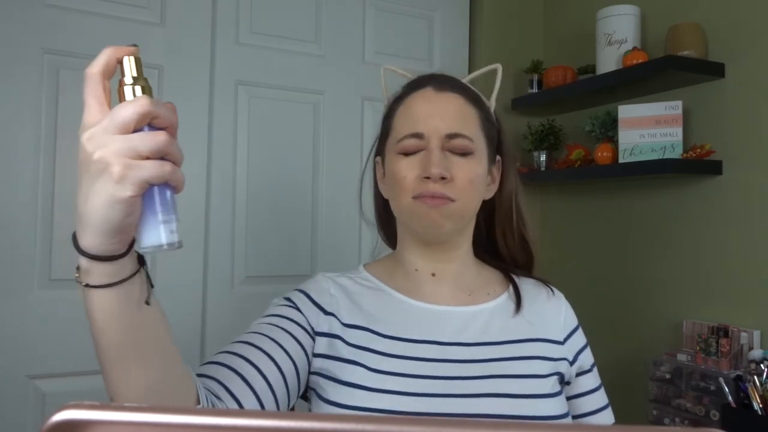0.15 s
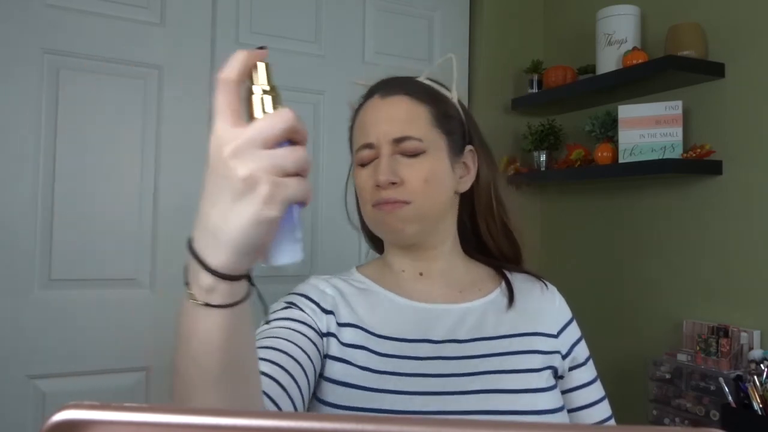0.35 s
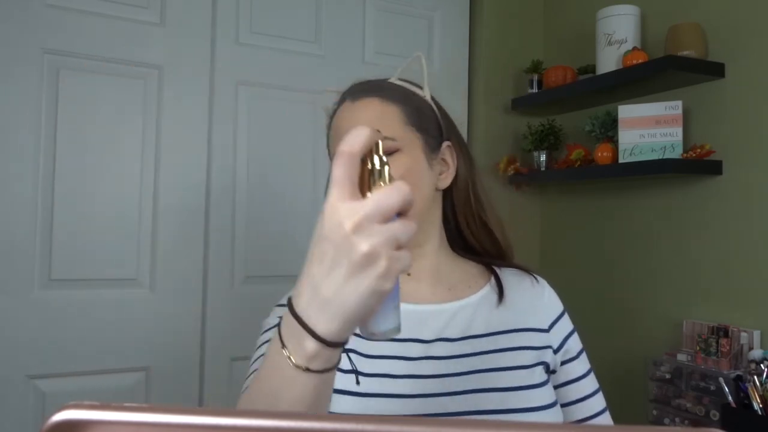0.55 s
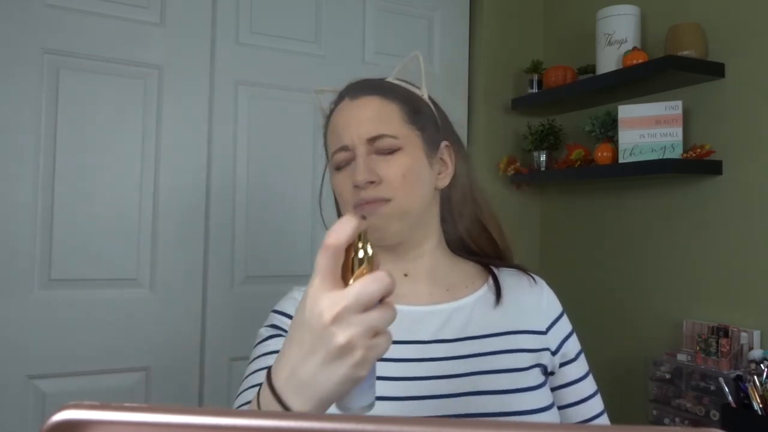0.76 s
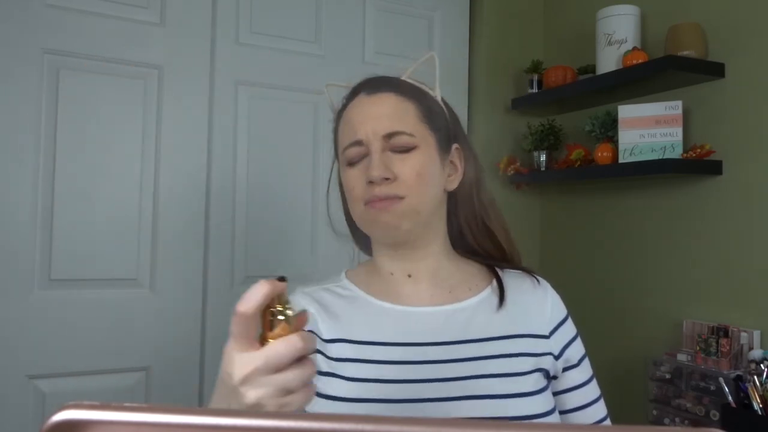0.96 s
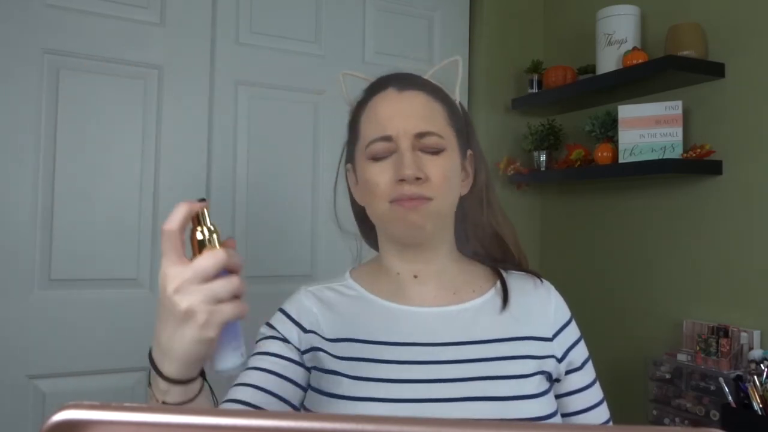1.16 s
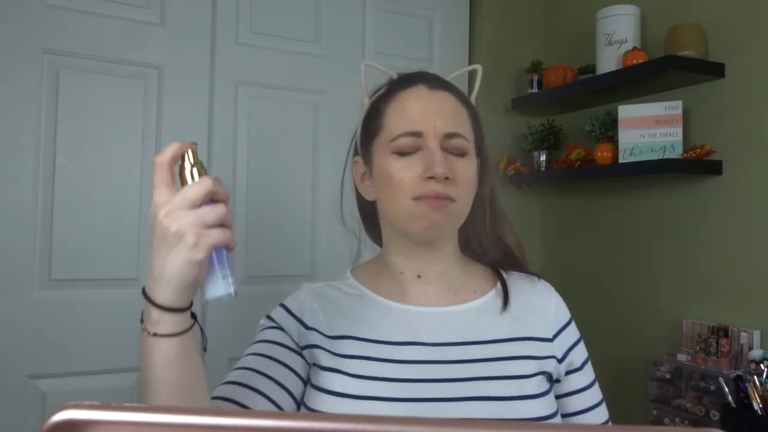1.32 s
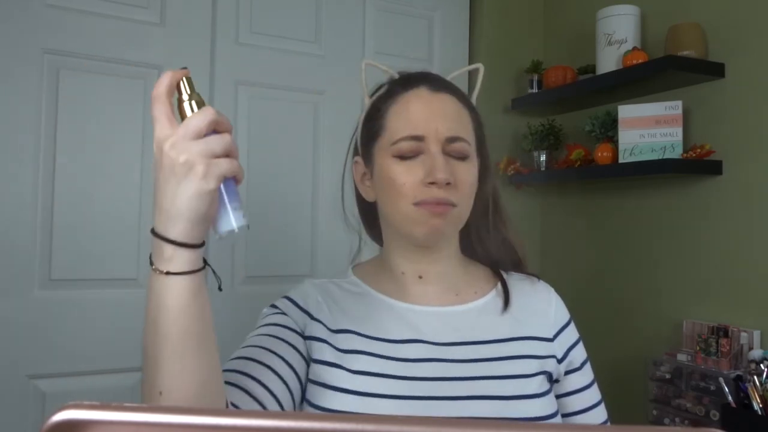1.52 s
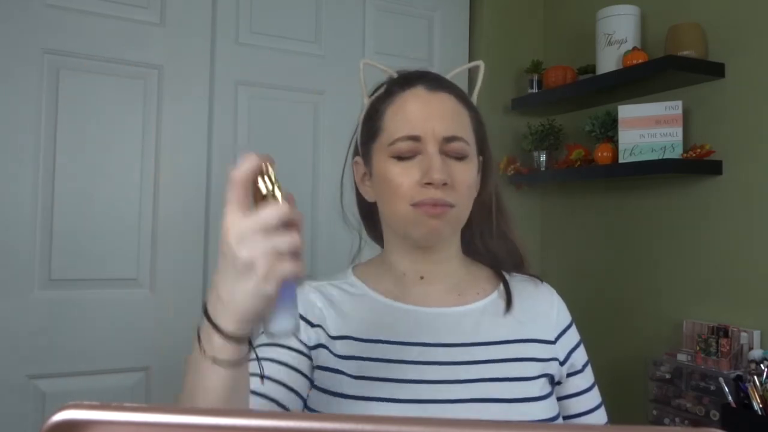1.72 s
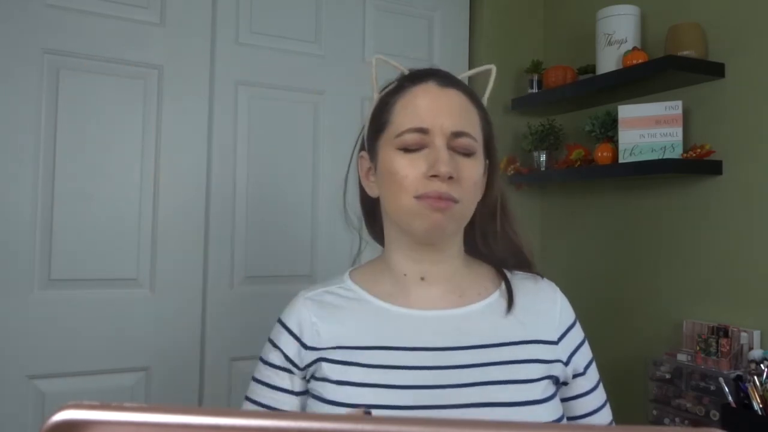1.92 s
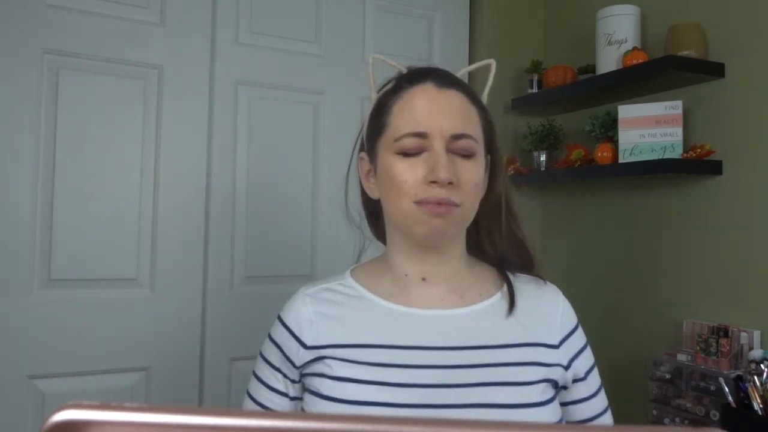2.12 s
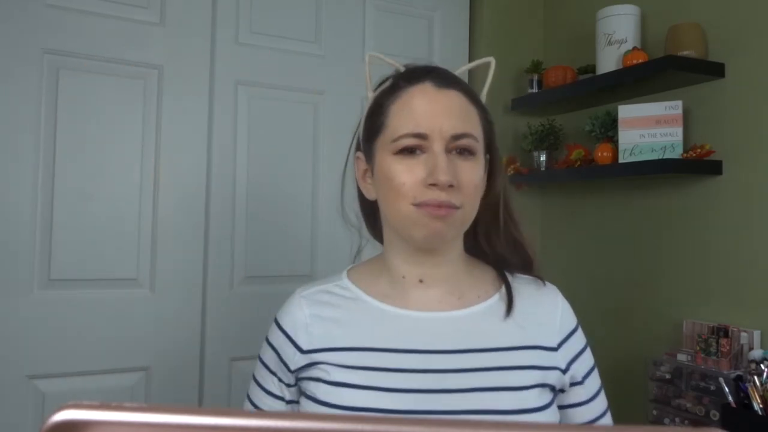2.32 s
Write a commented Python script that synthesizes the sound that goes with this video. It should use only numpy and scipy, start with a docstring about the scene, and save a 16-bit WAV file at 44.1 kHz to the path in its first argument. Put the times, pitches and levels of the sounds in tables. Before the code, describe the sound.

A hand mist sprayer is pumped quickly, short bright hisses ending in hard clicks, with spring ticks and faint refill fizz between; a last press follows a pause, then a soft low table thud. Close stereo microphone, small live room.

```python
"""A small mist pump is pressed quickly seven times in a small room.
Presses: coloured noise hisses through the nozzle until the plunger snaps against its stop.
Spring and refill: ticks with dull knocks and short rings; grainy noise as the chamber refills.
At the end the bottle is set down: table modes, a low noise shudder and a slow sway.
Echoes are noise responses in decaying bands; quiet room air and a faint hum lie beneath."""
import sys
import numpy as np
from scipy import signal
from scipy.fft import rfft, irfft
from scipy.io import wavfile
from scipy.ndimage import map_coordinates

SR = 44100
rng = np.random.default_rng(int(sys.argv[2]) if len(sys.argv) > 2 else 0)


def wrap_up_sound(samples):
    """Save the sound to the file named by the first command line argument, as 16-bit audio."""
    columns = np.atleast_2d(samples).T
    # keep every value between -1 and 1, then stretch to whole-number steps
    tamed = np.clip(columns, -1, 1)
    steps = np.round(tamed * 32767).astype(np.int16)
    wavfile.write(sys.argv[1], SR, steps)


N = 104958
LEAD = SR // 4  # samples run before the scene, cut off at the end
T = np.arange(-LEAD, N) / SR


def undb(db):
    """Decibels to gain."""
    return 10 ** (np.asarray(db) / 20)


def unit(x):
    """Scale to rms 1."""
    return x / np.sqrt(np.mean(x ** 2))


def noise():
    """White noise for the whole scene."""
    return rng.standard_normal(len(T))


def walk(hz):
    """Random values at rate hz, joined by straight lines, rms 1."""
    knots = rng.standard_normal(len(T) // 2)
    return unit(np.interp((T - T[0]) * hz, np.arange(len(knots)), knots))


def fade(age, t60):
    """Exponential decay that starts at age 0 and falls 60 dB in t60."""
    return (age >= 0) * np.exp(-np.log(1000) * np.maximum(age, 0) / t60)


def onset(age, rise_s):
    """Exponential approach to 1 with time constant rise_s."""
    return 1 - np.exp(-age / rise_s)


def through(x, response):
    """Convolve with a response, keeping the length."""
    return signal.fftconvolve(x, response)[:len(x)]


def colour(x, points, size=4096):
    """Minimum-phase filter of unit energy through (Hz, dB) points."""
    hz, db = np.array(points, float).T
    f = np.maximum(np.fft.rfftfreq(size, 1 / SR), 1)
    log_gain = np.log(undb(np.interp(np.log(f), np.log(hz), db)))
    cepstrum = irfft(log_gain)
    # folding the cepstrum makes the filter causal
    cepstrum[1:size // 2] *= 2
    cepstrum[size // 2 + 1:] = 0
    h = irfft(np.exp(rfft(cepstrum)))
    return through(x, h / np.sqrt(np.sum(h ** 2)))


def pan(x, db):
    """Place a sound by its left-right difference."""
    return x * undb(np.array([[db], [-db]]) / 2)


CONTACT_GAP_S, FIRST_CONTACT_DB = .00014, -5.5
CAP_RATTLE_DB, CAP_T60_S = -5, 0.0072


def snap(at):
    """Hard double contact, two opposite impulses, and a very short noise rattle of the cap."""
    x = noise() * fade(T - at, CAP_T60_S)
    x *= undb(CAP_RATTLE_DB) / np.sqrt(np.sum(x ** 2))
    x[np.searchsorted(T, at)] += undb(FIRST_CONTACT_DB)
    x[np.searchsorted(T, at + CONTACT_GAP_S)] -= 1
    return x / np.hypot(1, undb(FIRST_CONTACT_DB))


# pump presses: start_s, stop_s, mist_level_db, swell_db, stop_click_db, left_minus_right_db
PRESSES = [(-.045, -.006, -42.5, 2.5, -12.5, -10.5), (0.218, .2511, -37.5, 4.5, -7, 5),
           (0.4597, 0.4938, -36.5, 3, -7, 1.5), (0.7039, .7650, -37, 2.5, -5.5, 1),
           (0.943, 1.0054, -37, 4, -5, 2), (1.2098, 1.2550, -36, 5.5, -11, 4),
           (1.6529, 1.6924, -40, 5.5, -8, 1.5)]
# nozzle mist spectrum: freq_hz, level_db
MIST_SPECTRUM = [(300, -29.5), (900, -18), (1400, -15), (2000, -4.5), (2700, -4), (4000, 2), (5100, -2.5),
                 (6200, -0.5), (7600, -4.5), (9000, -2.5), (11000, -9.5)]
# plunger stop spectrum: freq_hz, level_db
STOP_SPECTRUM = [(300, -24.5), (900, -19.5), (1500, -14), (2300, 0.5), (3400, 0), (5000, -3.5), (6800, 4),
                 (8500, -7.5), (11000, -13)]
OPEN_S, CLOSE_S = 0.0016, 0.0027
SPUTTER_DB, SPUTTER_HZ = -0.14, 705
MIST_WIDTH = 0.24  # side rms re jet before sputter


def presses():
    """Mist swells with finger pressure and shuts off as the plunger hits its stop."""
    out = 0
    jet = unit(colour(noise(), MIST_SPECTRUM)) * undb(SPUTTER_DB * walk(SPUTTER_HZ))
    cloud = MIST_WIDTH * unit(colour(noise(), MIST_SPECTRUM)) * np.array([[1], [-1]])
    for start, stop, mist_db, swell_db, stop_db, pan_db in PRESSES:
        travel = np.clip((T - start) / (stop - start), 0, 1)
        opening = np.clip((T - start) / OPEN_S, 0, 1)
        flow = opening * np.exp(-np.maximum(T - stop, 0) / CLOSE_S)
        mist = (jet + cloud) * flow * undb(mist_db + swell_db * (travel - 1.0))
        click = undb(stop_db) * colour(snap(stop), STOP_SPECTRUM)
        out = out + pan(mist + click, pan_db)
    return out


# room by band: lower_edge_hz, tail_t60_s, stereo_width_ratio
WALLS = [(0, 0.86, 0.67), (1520, 0.94, 0.37), (2940, 0.75, 0.8), (5310, 0.56, 1.3), (8100, 0.61, 1.1)]
EARLY_DB, EARLY_T60_S, LATE_DB, FIRST_ECHO_S = -0.5, 0.26, -3.5, 0.0036


def echoes():
    """Room response for one place of the hand: dense early echoes and a weaker, longer tail."""
    age = np.arange(SR) / SR - FIRST_ECHO_S
    lower_edges = [row[0] for row in WALLS]
    band = np.searchsorted(lower_edges, np.fft.rfftfreq(SR, 1 / SR)) - 1
    spectra, out = rfft(rng.standard_normal((2, SR))), 0
    for k, (_, t60, width) in enumerate(WALLS):
        mid, side = irfft(spectra * (band == k), SR)
        early = undb(EARLY_DB) * unit(fade(age, EARLY_T60_S))
        late = undb(LATE_DB) * unit(fade(age, t60))
        shape = np.hypot(early, late) / np.sqrt(SR)
        stereo = np.array([mid + width * side, mid - width * side]) / np.hypot(1, width)
        out = out + shape * stereo
    return out


# echo spectrum: freq_hz, level_db
ROOM_SPECTRUM = [(200, 10.5), (1000, 1.5), (1600, 4), (2200, 1.5), (2900, -1.5), (4100, 0.5), (5200, -2.5),
                 (5900, 5.5), (6800, 7), (7600, 1), (9400, 3), (11000, -1.5)]
ECHO_CHANGE_HZ, ROOM_PAN_DB = 35, 1.5


def room(x, count=5):
    """Random shares of several responses: echoes keep changing as the hand sweeps the bottle about."""
    wet = colour(x, ROOM_SPECTRUM)
    shares = np.array([walk(ECHO_CHANGE_HZ) for _ in range(count)])
    shares /= np.sqrt(np.sum(shares ** 2, axis=0))
    parts = [np.array([through(wet * share, w) for w in echoes()]) for share in shares]
    return pan(sum(parts), ROOM_PAN_DB)


ALIKE_HZ = 510  # side high-pass corner


def diffuse(points):
    """Noise from all around: the bass is alike in both ears, the treble is not."""
    mid, side = colour(noise(), points), colour(noise(), points)
    highpass = signal.butter(1, ALIKE_HZ, "high", fs=SR, output="sos")
    side = signal.sosfilt(highpass, side)
    return (mid + side * np.array([[1], [-1]])) / np.std(mid)


# room air spectrum: freq_hz, level_db
AIR_SPECTRUM = [(20, -18), (40, -9), (80, -0.5), (118, 1), (160, 1), (250, 0.5), (420, 4), (650, 3.5),
                (1000, -1), (1400, -7), (2300, -6), (4000, -14.5), (7000, -15.5), (11000, -23)]
AIR_DB, AIR_BALANCE_DB = -62.5, 0.8
HUM_HZ, HUM_DB, HUM_WAVER_HZ = 114.4, -75, 8.11


def background():
    """Still room air as diffuse noise; a faint hum wavers in level and phase."""
    hum = (1 + walk(HUM_WAVER_HZ) / 2) * np.sin(2 * np.pi * HUM_HZ * T + walk(HUM_WAVER_HZ))
    air = pan(diffuse(AIR_SPECTRUM), AIR_BALANCE_DB)
    return undb(AIR_DB) * air + undb(HUM_DB) * hum


TICK_PAN_DB = 3  # left minus right, spring and refills
# liquid drawn into the chamber: start_s, length_s, level_db
REFILLS = [(0.12, 0.1, -57.5), (0.374, 0.031, -73), (0.621, 0.017, -51.5), (0.835, 0.045, -52),
           (1.086, 0.016, -45.5), (1.364, 0.029, -51), (1.942, 0.055, -55)]
# refill spectrum: freq_hz, level_db
REFILL_SPECTRUM = [(300, -33), (1400, -12.5), (2300, 2.5), (3200, -6.5), (5000, -8.5), (6400, -1.5),
                   (7600, -7.5), (9200, -6.5), (11000, -10.5)]
REFILL_RISE_S, REFILL_FALL_S = 0.013, 0.018
REFILL_GRAIN_DB, REFILL_GRAIN_HZ = 4.5, 900


def refills():
    """Grainy fizz of liquid sucked past the valve: noise with a fast random level."""
    draw = 0
    for at, length, db in REFILLS:
        rise = np.clip((T - at) / REFILL_RISE_S, 0, 1)
        fall = np.exp(-np.maximum(T - at - length, 0) / REFILL_FALL_S)
        draw = draw + undb(db) * rise * fall
    grains = noise() * undb(REFILL_GRAIN_DB * walk(REFILL_GRAIN_HZ))
    return pan(draw * unit(colour(grains, REFILL_SPECTRUM)), TICK_PAN_DB)


# spring and plunger ticks: start_s, tick_level_db, ring_level_db (also sets knock), ring_pitch_hz
TICKS = [(0.1249, -22, -47, 2630), (0.1355, -22.5, -30, 2300), (0.152, -30, -32.5, 2550),
         (0.1942, -21, -25, 2280), (0.3704, -18.5, -39, 2830), (.3808, -16.5, -24.5, 2266),
         (.3835, -27, -24.5, 2260), (0.3981, -48, -33, 2420), (.4375, -22.5, -21, 2206),
         (0.6123, -25, -37, 1810), (.633, -62, -22.5, 2380), (.6425, -52, -37.5, 2280),
         (.6705, -18.5, -22.5, 2010), (.676, -25, -29.5, 1930), (0.8426, -21, -33, 2740),
         (.8545, -23.5, -29.5, 2250), (.872, -39, -31, 2340), (.9128, -31, -28.5, 2240),
         (1.091, -22, -55, 2250), (1.1026, -40, -41, 2280), (1.121, -32, -42, 2380),
         (1.1729, -45, -31.5, 2360), (1.364, -27, -35.5, 2020), (1.375, -26, -34, 2070),
         (1.382, -43, -36, 2070), (1.393, -27, -42, 2350), (1.605, -44, -43, 2130),
         (1.9498, -58, -35, 2460), (1.976, -42, -43, 2540)]
# dry tick spectrum: freq_hz, level_db
TICK_SPECTRUM = [(300, -27.5), (1200, -28.5), (2200, 9), (3800, -1.5), (5000, -1.5), (6100, 10),
                 (7600, -1.5), (9300, -2), (11000, -20)]
# dull knock spectrum: freq_hz, level_db
KNOCK_SPECTRUM = [(200, -10.5), (700, 1), (1500, -7.5), (1850, 5), (2800, 1.5), (3600, -7), (11000, -29)]
KNOCK_DB = -5.5  # re ring level
RING_T60_S, RING_RISE_S = 0.01, 0.0012
RING_WANDER_RAD, RING_WANDER_HZ = 0.45, 899.5


def spring():
    """Dry mechanism ticks, each with a dull knock and a short, unsteady ring of the wet pump chamber."""
    ticks, knocks, rings = 0, 0, 0
    wander = RING_WANDER_RAD * walk(RING_WANDER_HZ)
    for at, tick_db, ring_db, hz in TICKS:
        age, contact = np.maximum(T - at, 0), snap(at)
        ticks = ticks + undb(tick_db) * contact
        knocks = knocks + undb(ring_db + KNOCK_DB) * contact
        tone = np.sin(2 * np.pi * hz * age + wander)
        rings = rings + undb(ring_db) * tone * fade(age, RING_T60_S) * onset(age, RING_RISE_S)
    return pan(colour(ticks, TICK_SPECTRUM) + colour(knocks, KNOCK_SPECTRUM) + rings, TICK_PAN_DB)


# base touches the table: start_s, level_db
TOUCHES = [(2.082, -59), (2.1072, -50), (2.243, -62)]
# table modes: pitch_hz, relative_level_db, t60_s
TABLE_MODES = [(117.5, -1, .5), (149, -12, .5), (211.5, -3, .65), (328, 1, .5), (359, -8, .4),
               (388, -9, .35), (556, -15, .6), (646, -14, .7)]
# table shudder spectrum: freq_hz, level_db
BUMP_SPECTRUM = [(15, -30), (25, 17), (45, -18), (110, 7), (180, -9.5), (270, -4.5), (370, 2), (470, -11),
                 (680, -7), (1000, -30), (2000, -13.5), (8000, -32.5)]
TOUCH_RISE_S = 0.0032
BUMP_S, BUMP_RISE_S, BUMP_T60_S, BUMP_DB = 2.078, 0.028, 0.62, -51.5
SWAY_HZ, SWAY_DB, SWAY_RISE_S, SWAY_T60_S = 23.8, -50.5, 0.047, 1


def set_down():
    """The base settles on the table: modes boom, diffuse noise shudders, a low sine sways."""
    boom = 0
    for at, touch_db in TOUCHES:
        age = np.maximum(T - at, 0)
        modes = sum(undb(db) * np.sin(2 * np.pi * hz * age) * fade(age, t60)
                    for hz, db, t60 in TABLE_MODES)
        boom = boom + undb(touch_db) * modes * onset(age, TOUCH_RISE_S)
    shudder = np.clip((T - BUMP_S) / BUMP_RISE_S, 0, 1) * fade(T - BUMP_S, BUMP_T60_S)
    age = np.maximum(T - BUMP_S, 0)
    sway = undb(SWAY_DB) * np.sin(2 * np.pi * SWAY_HZ * age)
    sway = sway * fade(age, SWAY_T60_S) * onset(age, SWAY_RISE_S)
    return boom + sway + undb(BUMP_DB) * shudder * diffuse(BUMP_SPECTRUM)


PORT_LAG_S = .000012  # right channel delay, direct sound
SPRING_ROOM_DB, JET_ROOM_DB = -3.5, -1.5


def scene():
    """The bottle near the microphone, its echoes, the table and the quiet room."""
    jet = presses()
    mechanism = spring() + refills()
    left, right = jet + mechanism
    later = map_coordinates(right, [np.arange(len(T)) - PORT_LAG_S * SR], mode="nearest")
    send = undb(JET_ROOM_DB) * jet + undb(SPRING_ROOM_DB) * mechanism
    walls = room(np.mean(send, axis=0))
    return (np.array([left, later]) + walls + set_down() + background())[:, LEAD:]


TOP_HZ = 11050


def record(dry):
    """The recorder cuts the top steeply with an elliptic low-pass."""
    lowpass = signal.ellip(10, .2, 70, TOP_HZ, fs=SR, output="sos")
    return signal.sosfilt(lowpass, dry)


dry = scene()
out = record(dry)
wrap_up_sound(out)
```